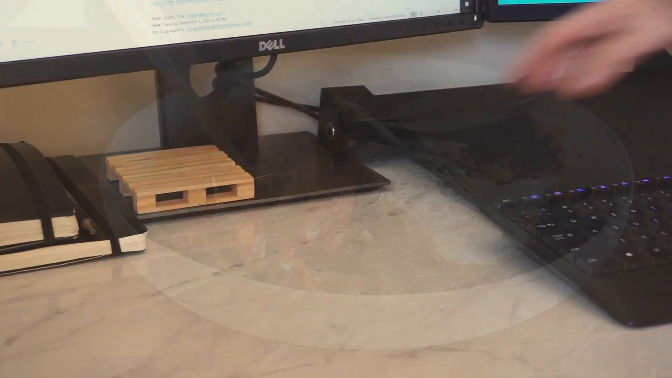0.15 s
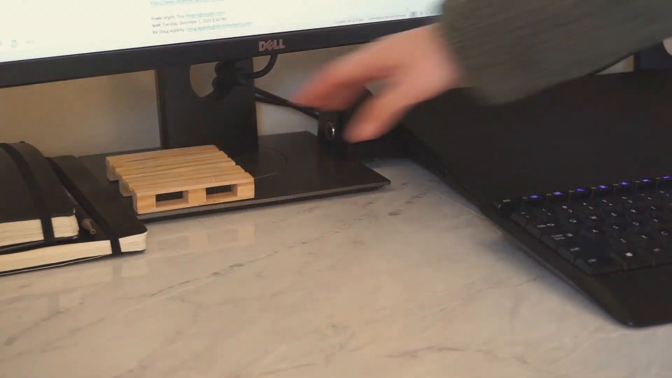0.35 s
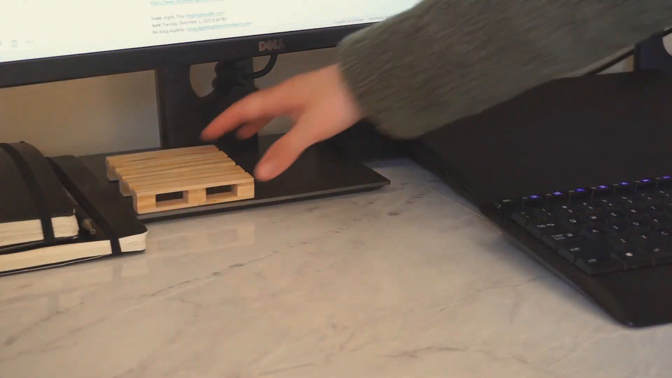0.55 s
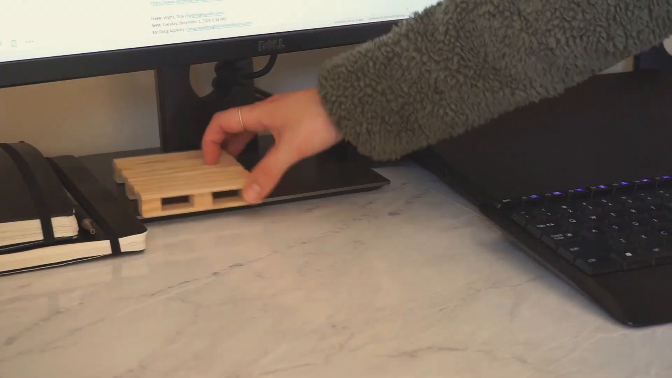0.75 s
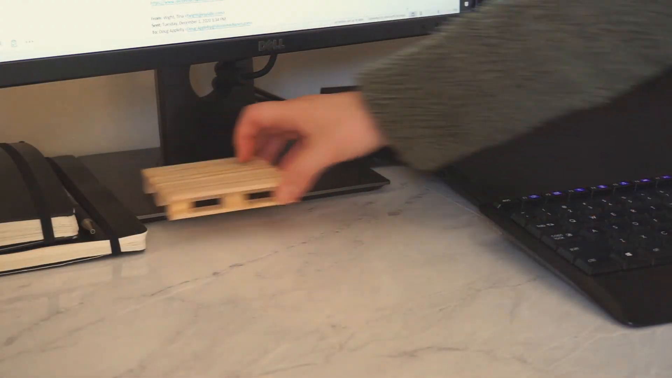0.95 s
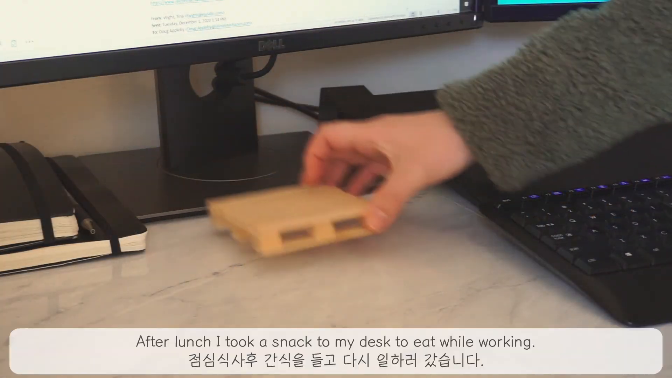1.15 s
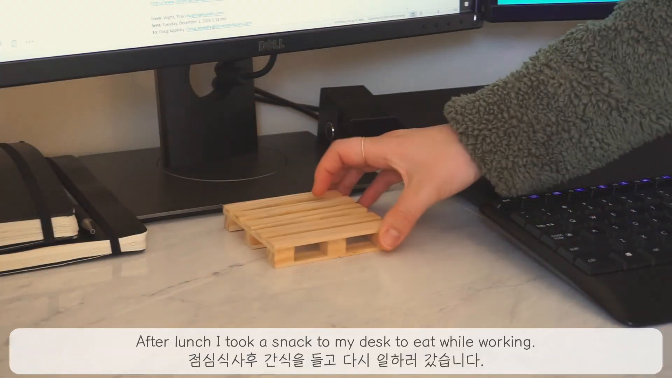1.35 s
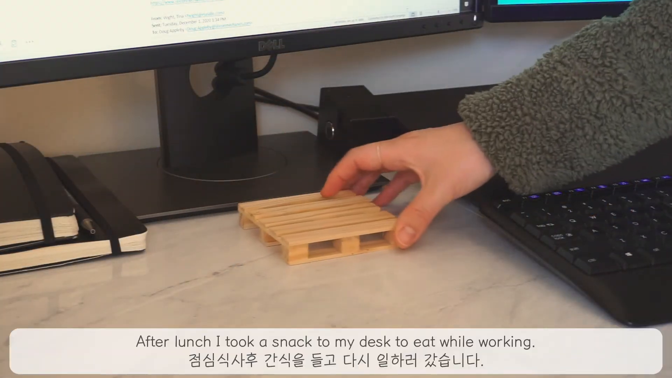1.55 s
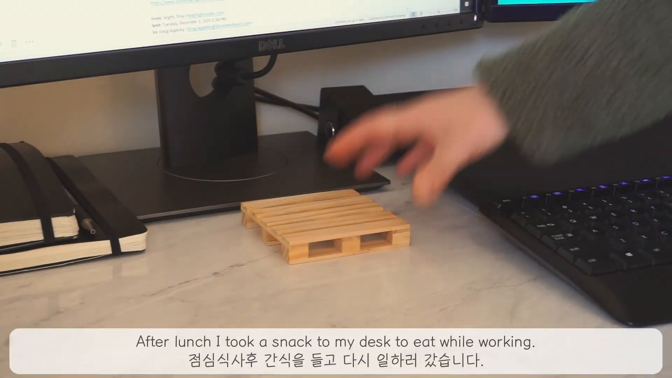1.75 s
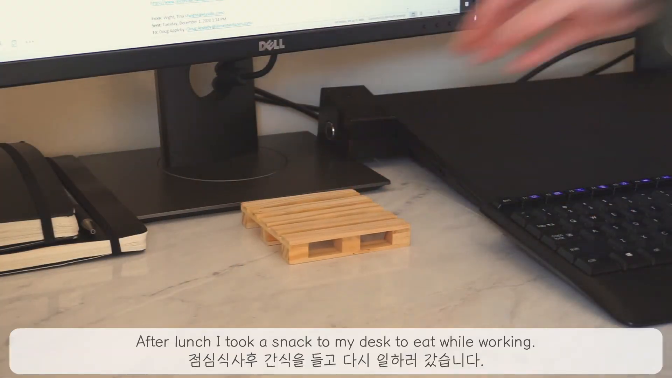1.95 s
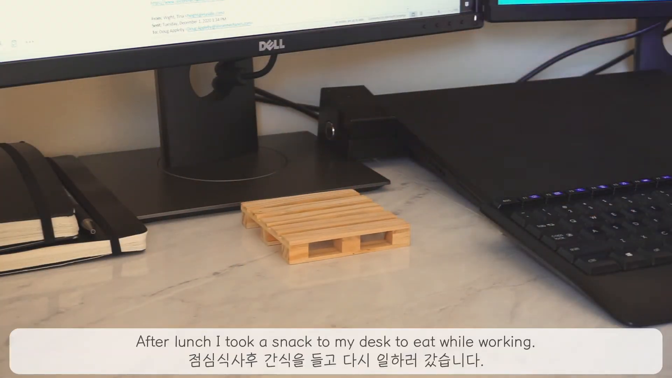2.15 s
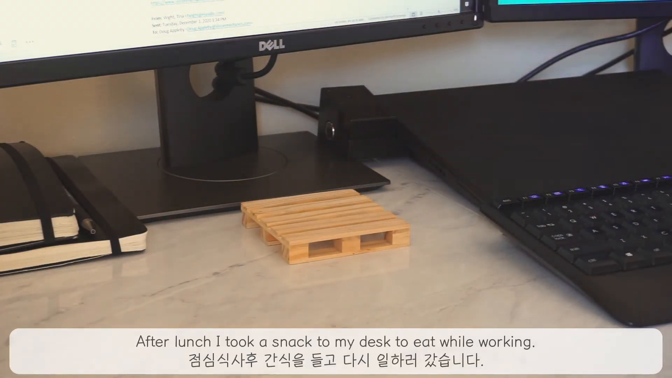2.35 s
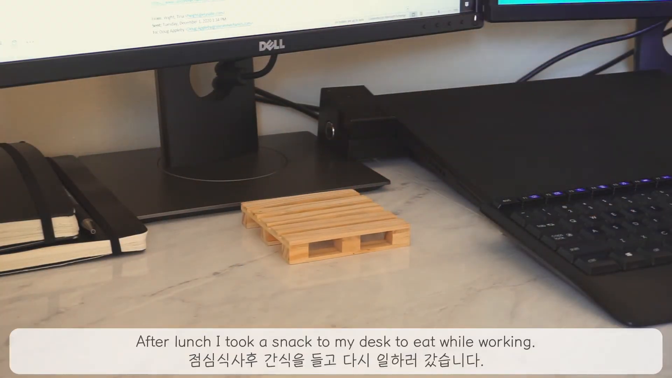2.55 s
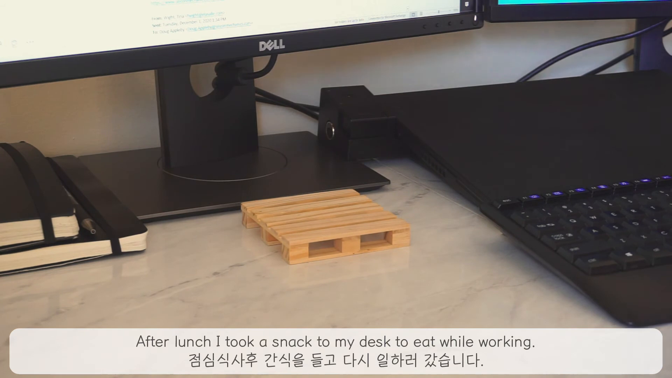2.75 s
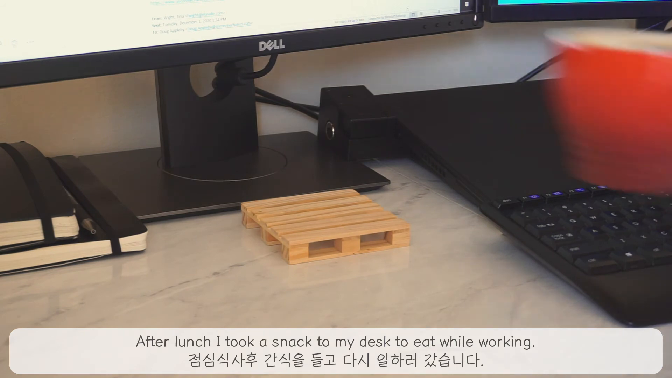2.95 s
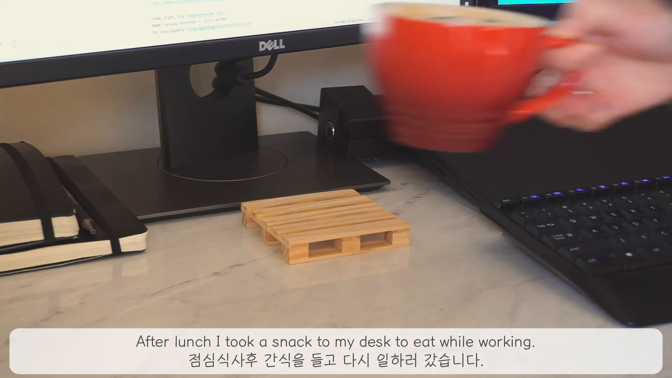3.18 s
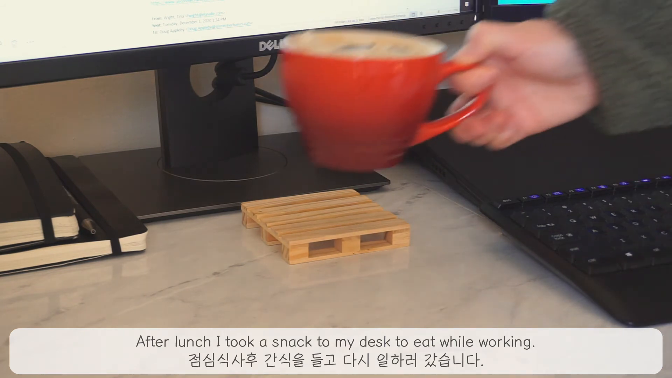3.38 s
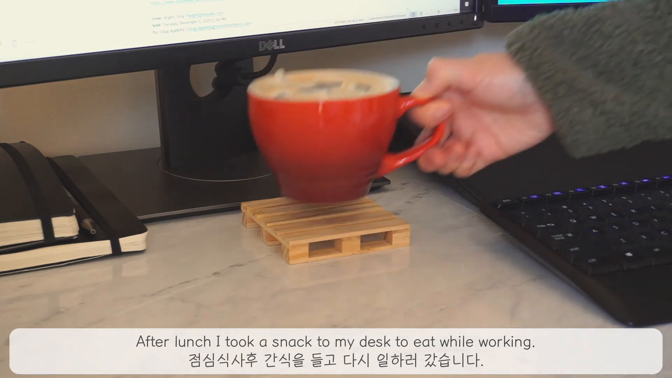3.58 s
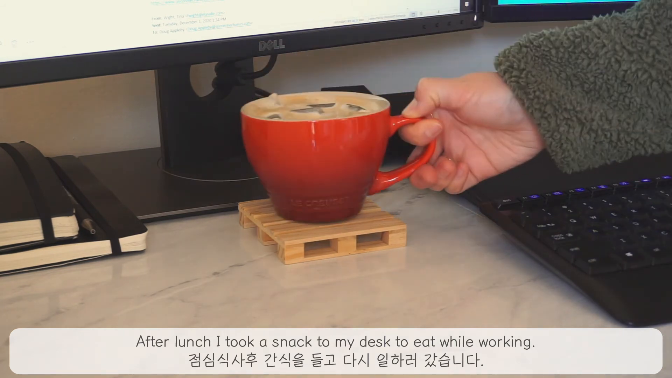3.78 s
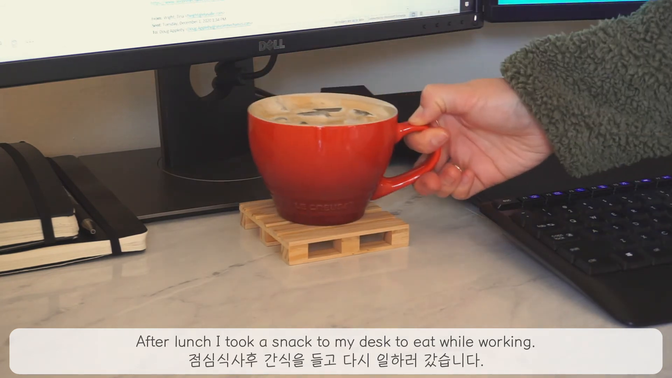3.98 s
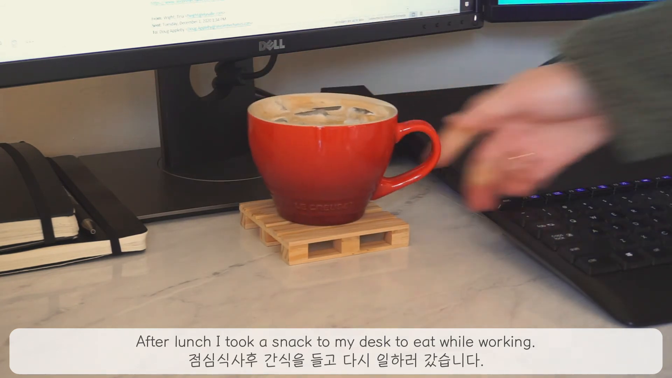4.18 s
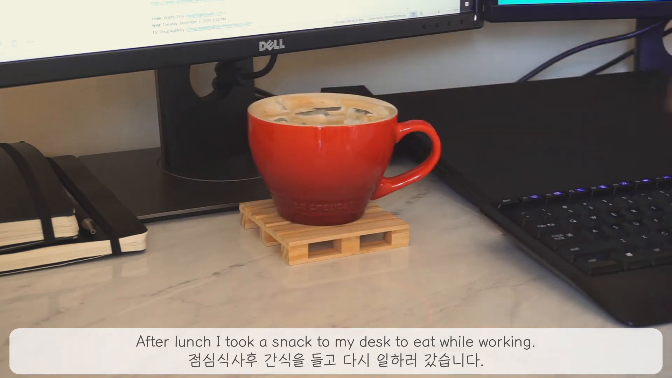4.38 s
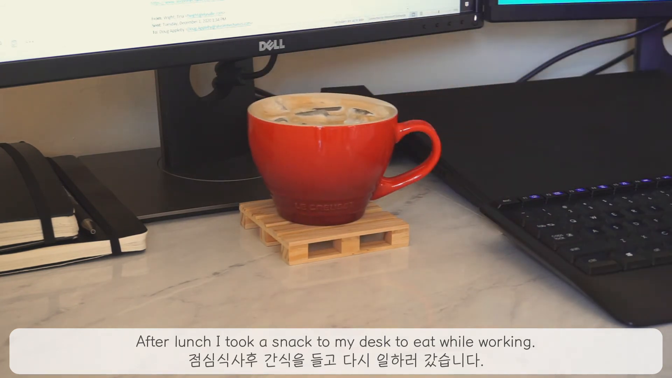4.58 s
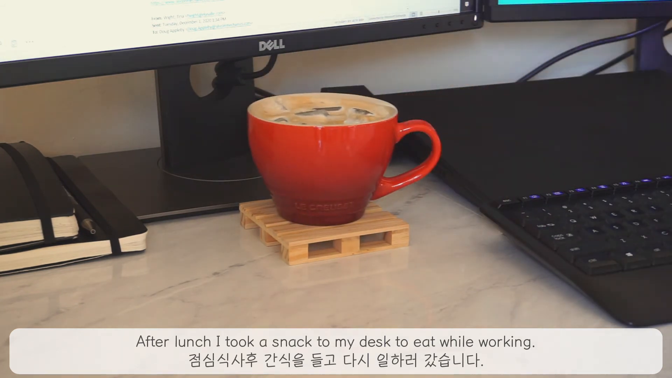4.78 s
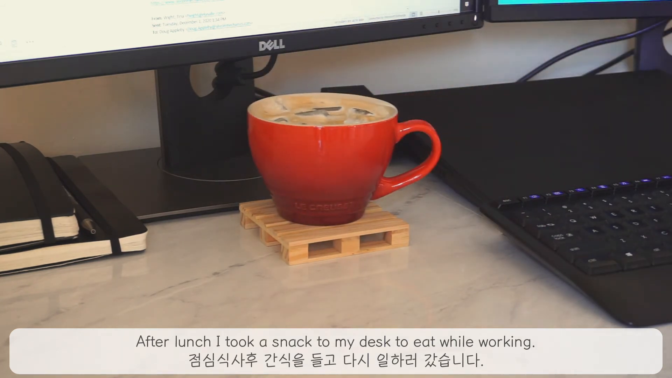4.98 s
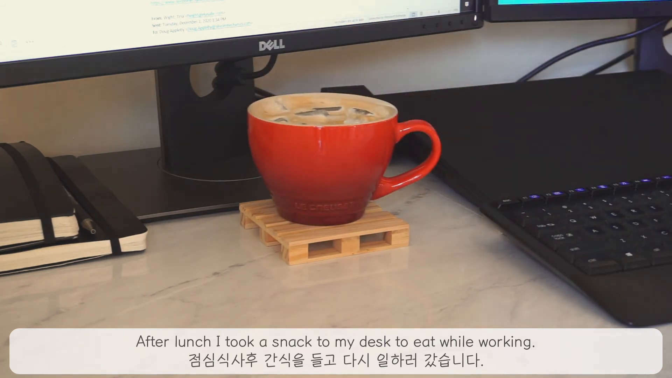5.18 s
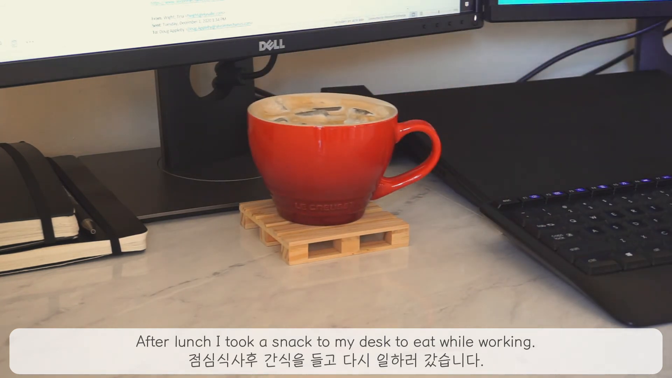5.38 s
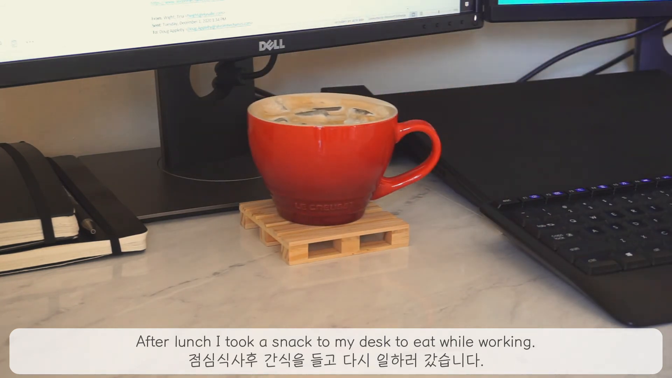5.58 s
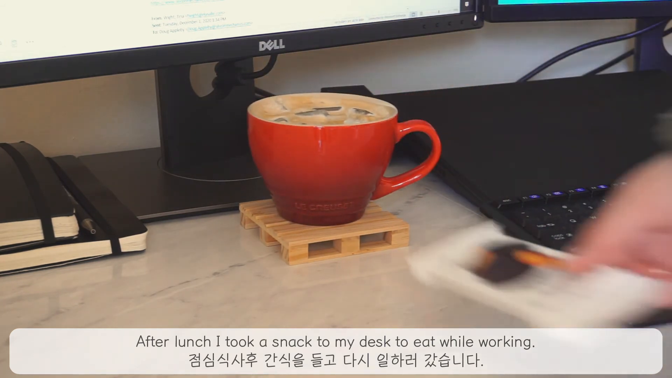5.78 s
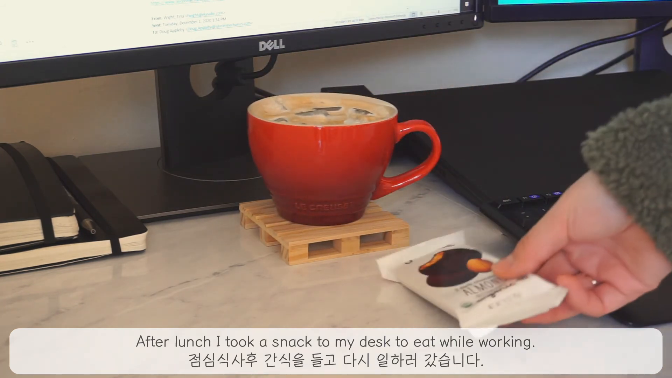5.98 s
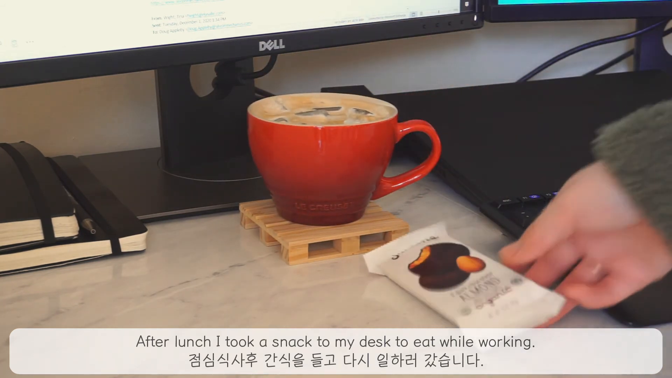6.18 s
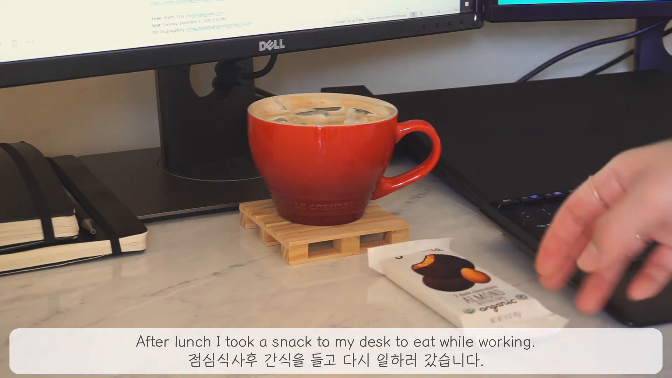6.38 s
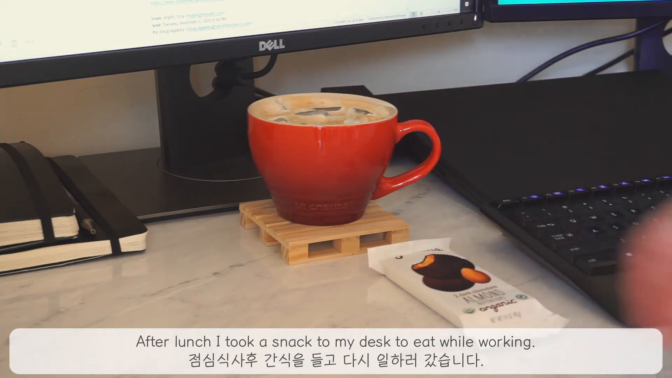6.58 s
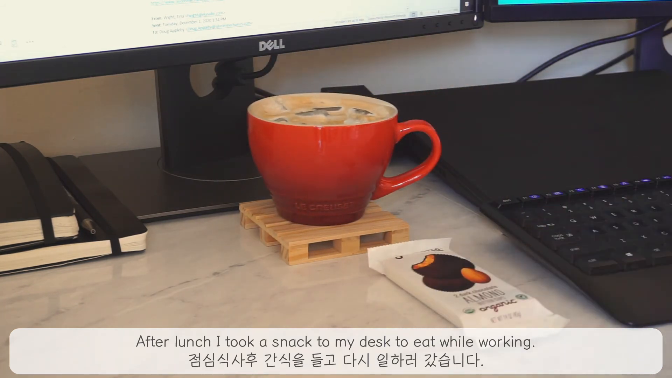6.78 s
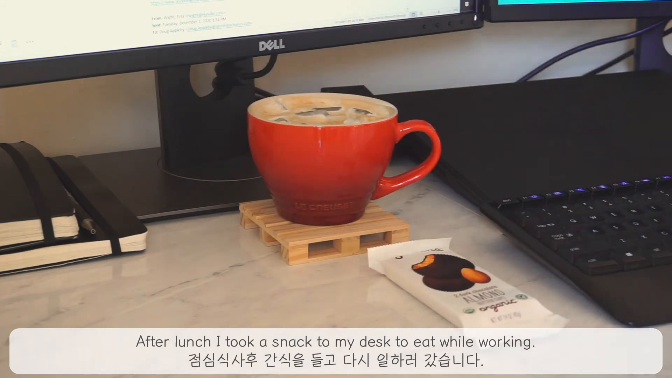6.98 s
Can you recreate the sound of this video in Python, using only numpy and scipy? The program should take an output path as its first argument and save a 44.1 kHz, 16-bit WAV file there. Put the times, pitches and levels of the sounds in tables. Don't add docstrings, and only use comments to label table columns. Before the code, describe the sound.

Close stereo on a desk in a quiet room. A small slatted wooden coaster judders briefly off a thin stand with a hard knock and short scrape, then is set down in two soft taps. A full ceramic mug lands on it with a gritty clunk and low desk boom. After a pause, a plastic snack packet crackles, slaps down and is pressed with sharp snaps. Faint sleeve rustle and hiss lie underneath.

```python
import sys
import numpy as np
from scipy import signal
from scipy.io import wavfile

SR = 44100
rng = np.random.default_rng(int(sys.argv[2]) if len(sys.argv) > 2 else 0)


def wav_out(sig):
    wavfile.write(sys.argv[1], SR, np.round(np.clip(np.atleast_2d(sig).T, -1, 1) * 32767).astype(np.int16))


def level_to_linear(level):
    exponent = np.asarray(level, float) / 20
    return 10 ** exponent


N = 310464

# t/s, level/dB
JUDDER = [
    (0.683, -32),
    (0.691, -28.5),
    (0.698, -21.5),
    (0.703, -24.5),
    (0.712, -25),
    (0.721, -24),
    (0.726, -37),
    (0.729, -34),
    (0.78, -52),
]
# f/Hz, level/dB, t60/s
STAND_MODES = [(737, -12, 0.056), (985, -3, 0.041), (1050, 0.5, 0.025), (1216, -3.5, 0.025),
               (1590, -10.5, 0.039), (1750, -5, 0.019), (2040, -4.5, 0.0073), (3070, -11, 0.0076),
               (4660, -22, .02)]
# t/s, level/dB, upper-mode share/dB
SLIPS = [(0.6841, -32, 4), (0.6867, -33, 3), (0.6899, -24, 0.5), (0.694, -34, 2), (0.6985, -35, 5),
         (0.702, -28, -2), (0.7084, -30, -9), (0.7148, -31, -6), (.7192, -25.5, -5), (0.7278, -29, -9),
         (0.7317, -37, -8), (0.7389, -35, -2), (0.7445, -33, -4), (0.7565, -36, 4), (0.7675, -37, -5),
         (0.772, -42, -2)]
# f/Hz, level/dB, t60/s
PRESSED_MODES = [(1065, 1, .028), (965, -9, .024), (1540, -10, .022), (1720, -9, .018), (2010, -11, .016)]
BREAKS_FREE_S, EASED_PITCH, EASED_RING = .7245, 0.89, .6
# t/s, level/dB, rise/s, fall/s
DRAG = [
    (0.79, -32.5, 0.0023, 0.021),
    (0.822, -37.5, 0.093, 0.065),
    (0.908, -43, 0.12, 0.091),
]
# t/s, level/dB, rise/s, fall/s
SLIDE = [
    (0.684, -43, 0.0027, 0.033),
    (0.779, -41.5, 0.089, 0.041),
    (0.787, -33, 0.0085, 0.017),
    (0.88, -39, 0.088, 0.15),
]
LEAVES_PLATE_S, LEAVING_S = 0.96, 0.01
# f/Hz, level/dB, t60/s
COASTER_MODES = [(198, -8, 0.016), (360, -4.5, 0.026), (595, -2, 0.071), (727, -2, 0.031),
                 (988, 3.5, 0.034), (1270, -1.5, 0.024), (1460, -4, 0.045), (1750, 6, 0.0057),
                 (2500, 0, 0.0075), (4050, -7, 0.012), (4880, -3.5, 0.011)]
# t/s, level/dB, left-right/dB
KNOCKS = [
    (0.786, -18, 7.5),
    (0.824, -39, 7),
    (0.918, -36, 6),
]
# t/s, level/dB, left-right/dB
LANDINGS = [
    (1.2368, -36, 3.5),
    (1.3365, -33, 4),
]
EDGE_CHOKE, EDGE_DB = 0.27, 6.5
# f/Hz, level/dB, t60/s
COASTER_DOWN_MODES = [(359, -2, 0.19), (567, -4, 0.052), (760, -3, 0.031), (900, -14, 0.021),
                      (1120, 1.5, 0.016), (1490, 0, 0.025), (1780, 1, 0.014), (2240, -7, 0.025),
                      (2590, -8.5, 0.017)]
# t/s, level/dB, rise/s, fall/s
SHUFFLE = [
    (1.243, -58, .001, 0.036),
    (1.343, -52, .001, 0.089),
]

# t/s, level/dB, f/Hz, dying/ms, broad part/dB
MUG_TOUCHES = [
    (3.743, -27, 1020, 2, -25),
    (3.738, -42, 1400, 2.5, -24),
    (3.7424, -30, 4870, 2, -23),
    (3.7432, -22, 2060, 0.87, -21),
    (3.7436, -21, 5000, 1.5, -8),
    (3.7459, -17, 2500, 1.3, -27),
    (3.7504, -30, 4500, 1.1, -24),
    (3.786, -31, 7500, 5.9, 7),
    (3.882, -42, 5070, 34, 5),
    (3.986, -49, 1200, 4.3, -8),
]
MUG_PAN_DB = 6
# f/Hz, level/dB, t60/s
MUG_MODES = [(325, -1, 0.012), (528, -6, 0.021), (700, -2.5, 0.012), (980, -4, 0.023), (1380, -2, 0.0064),
             (1800, 1, 0.012), (2050, 1, .01), (2440, -1, 0.011), (2760, -3, 0.012), (4400, 0, 0.0029),
             (5100, -13, 0.0069), (7500, -10, .002), (9500, -25, .002)]
# f/Hz, level/dB, t60/s
CLINK_MODES = [(2040, -24, .008), (2690, -40, 0.018), (4940, -24.5, 0.015), (1500, -35, 0.04)]
CLINK_S = 3.7426
# t/s, level/dB, rise/s, fall/s
SETTLE = [
    (3.748, -31.5, .001, 0.024),
    (3.775, -38, 0.027, 0.11),
    (3.883, -49.5, .02, 0.062),
]

# f/Hz, level/dB, t60/s, side of the node line
DESK_MODES = [(81.4, -26, .21, 1), (97.1, -22, .16, 1), (109.3, -13, .02, -1), (119.3, -15, .21, 1),
              (124.7, -20, .58, -1), (138.2, -23, .35, -1), (149.3, -38, .48, -1), (181, -37, .3, 1),
              (203.6, -46, .6, 1), (249.7, -39, .08, 1), (349.2, -33, .08, -1)]
MUG_LANDS_S = 3.7425
STILLED_S, STILLING_S = 3.955, 0.055
# t/s, level/dB
PUSHES = [
    (1.338, -44),
    (2.437, -44),
    (3.985, -41.5),
    (4.237, -47),
]
# t/s, level/dB
PATS = [
    (0.689, -43.5),
    (0.789, -36),
    (1.238, -44),
    (3.985, -50),
    (5.995, -47),
    (6.246, -55),
    (6.298, -55),
    (6.33, -55),
]
# f/Hz, level/dB, t60/s
DESK_HELD_MODES = [(78, -2.5, 0.077), (122.4, -3, 0.37), (154, -5, 0.12), (242, -9.5, 0.13)]

# t/s, level/dB, f/Hz, dying/ms, left-right/dB
SNAPS = [(4.254, -41, 5500, 1.5, 14), (5.345, -45, 2680, 1.4, -4), (5.573, -46, 3150, 1.5, -12),
         (5.6335, -44, 2600, 2, -4), (5.645, -45, 3840, 3.7, -11), (5.706, -43, 3550, 13, -8),
         (5.751, -43, 3520, 1, -9), (5.875, -57, 4440, 1.3, -4), (5.946, -44, 6460, 1.3, -3),
         (5.979, -25, 2580, 1.7, -4), (5.985, -42, 2690, 1.3, 0), (5.9925, -25, 2580, 1.3, -3),
         (5.995, -14, 6000, 0.43, 6), (6.003, -31, 4500, 1.5, 6), (6.0081, -21.5, 3860, 0.84, 3),
         (6.01, -24, 4130, 1.3, 6), (6.024, -44, 2680, 1.3, 5), (6.1714, -22, 3230, 4.7, 1.5),
         (6.181, -24, 3830, 1, 6), (6.338, -41, 2780, 1.7, -3)]
# t/s, level/dB, f/Hz, dying/ms, left-right/dB
CRACKS = [
    (5.39, -20.5, 2310, 4.3, -9),
    (5.397, -22.5, 3400, 2.9, 6),
    (5.596, -46, 4000, 1.3, -12),
    (6.183, -20, 2290, 0.48, 6),
    (6.243, -19, 3220, 1.6, 0),
    (6.245, -22.5, 2500, 4.8, 6),
    (6.251, -23, 3820, 2.7, 2),
    (6.298, -33, 2780, 2, -2),
]
SNAP_BROAD_DB, CRACK_BROAD_DB = -16, 0
# t/s, level/dB, f/Hz, dying/ms
THUDS = [(4.245, -47, 5500, 6.1), (4.973, -43, 1490, 9.9), (6.1725, -29.5, 1560, 2.9),
         (2.965, -49, 2500, 40), (6.213, -29, 2500, 14), (4.903, -46, 3570, 20), (5.389, -29, 948, 3.6),
         (5.794, -36, 780, 6.8), (5.996, -18.5, 1150, 4.2), (6.05, -37, 3300, 11), (6.174, -34, 3550, 1.6),
         (6.2445, -35, 920, 3.5), (6.299, -30, 700, 2.6)]
THUD_PAN_DB, THUD_BROAD_DB, THUD_BROAD_DB_PER_OCTAVE = -2, -13, 1
# t/s, level/dB, rise/s, fall/s
CRACKLE = [(4.905, -50.5, 0.0033, 0.19), (4.961, -58, 0.013, 0.082), (5.05, -64, 0.24, 0.91),
           (5.355, -58, 0.075, 0.18), (5.63, -58, 0.49, 0.13), (5.712, -65, 0.07, .11),
           (5.75, -55.5, 0.045, 0.19), (5.81, -56, 0.043, 0.05), (5.86, -64, .021, 0.29),
           (5.979, -41.5, 0.0061, 0.03), (6.05, -49.5, 0.022, 0.038), (6.14, -57.5, 0.4, .3),
           (6.221, -44.5, 0.027, 0.02), (6.256, -46.5, .04, 0.13), (6.304, -38, 0.021, 0.013),
           (6.339, -53, 0.023, 0.026), (6.355, -71, .021, 0.11)]
# t/s, level/dB
SPRINGS = [
    (5.404, -42.5),
    (6.013, -39.5),
    (6.184, -41.5),
]
SPRING_RISE_S, SPRING_FALL_S, RELAX_DB, RELAX_FALL_S = 0.0061, 0.007, -10, 0.13
# f/Hz, level/dB per Hz
FILM = [(250, -17), (500, -6.5), (1000, -8.5), (2000, -6), (3000, -6.5), (5000, -9), (7500, -17),
        (11000, -11.5)]
# t/s, level/dB, left-right/dB
PRICKS = [(4.9045, -40, 0), (5.3975, -29, 3), (5.5965, -33, -4), (5.6338, -34, -3), (5.6358, -31, -3),
          (5.6415, -34, -3), (5.7518, -26, -4), (5.9927, -21, 0), (5.9951, -11, 4), (5.9966, -15, 2),
          (6.1717, -15, 2), (6.1738, -18, 2), (6.2437, -24, 2)]
PRICK_LOW_HZ = 1800

# t/s, level/dB, f/Hz, t60/ms, left-
# right/dB
PINGS = [(.7875, -21, 1780, 27, 4), (0.7939, -36.5, 187, 61, 0), (3.7435, -24, 1900, 5, 4),
         (3.8805, -38, 6200, 3, 3), (4.2435, -50, 3480, 20, 1), (4.247, -51, 2930, 20, 3),
         (4.251, -44, 2600, 20, 3), (4.2542, -41, 3100, 4, 3), (4.2524, -46, 9200, 5, 3),
         (5.3895, -37.5, 900, 35, -1.5), (5.3896, -37, 2240, 14, -1.5), (5.397, -28, 5040, 5.6, 5),
         (5.3985, -33, 2570, 9, 1.5), (5.634, -39, 8000, 1.2, -3), (5.7527, -43, 2800, 1.5, -3),
         (5.7945, -49, 2100, 14, -1.5), (5.7975, -43.5, 760, 45, -1.5), (5.9949, -24, 5940, 4.4, 6),
         (5.996, -30, 1148, 17, 4), (.8245, -39, 1780, 18, 1), (.9185, -30, 1003, 25, 4),
         (5.9783, -32, 2610, 19, -1.5), (5.9865, -38, 2700, 12, 3), (6.0085, -26, 1510, 6.3, 0),
         (6.047, -45, 1030, 90, 3), (6.056, -40, 1037, 60, 3), (6.1712, -25, 3600, 10, 1),
         (6.1735, -40, 3270, 11, 2.5), (6.1798, -31, 3940, 8.3, 2.5), (6.1828, -32, 2120, 14, 0),
         (6.2135, -34, 5670, 25, 1.5), (6.2185, -36, 2810, 25, 1.5), (6.2425, -29, 3330, 8, 5),
         (6.2427, -30, 1600, 13, 4), (6.3005, -39, 5200, 6, 1.5), (6.2455, -30.5, 2450, 14, 10),
         (6.2995, -35, 3000, 9.5, 1.5), (6.3372, -39, 2760, 12, -1),
         (.797, -37, 273, 52, -2),
    (2.2, -53.5, 720, 34, 1.5),
    (5.7957, -46.5, 330, 43, 1.5),
    (6.1718, -35.5, 660, 13, 2.5),
    (6.2446, -36.5, 416, 28, 2.5),
    (6.2535, -40, 900, 14, 2.5),
    (6.302, -38, 514, 32, 1.5),
    (6.304, -42.5, 736, 30, 1.5),
    (.918, -40, 403, 32, 2),
]
# t/s, level/dB, f/Hz, t60/ms, left-right/dB
DRY_PINGS = [
    (3.7435, -9.5, 2300, 5, 4),
    (3.984, -38, 140, 50, 0),
    (6.2455, -36, 145, 50, 1),
    (6.2985, -31, 132, 48, 1),
    (6.3325, -41, 145, 60, 1),
    (5.995, -18, 2200, 3, 1),
    (3.746, -20, 2550, 9, 4),
]
CYCLES_MAX = 32

# t/s, dull rub level/dB, rise/s, fall/s, brightness/dB
SLEEVE = [(.3, -64.5, 1.2, 0.8, -1.5), (.58, -69, 0.34, 0.44, -1.5), (1.04, -64, .08, 0.6, -2.5),
          (1.46, -70.5, 0.056, 0.27, -2), (1.652, -69.5, 0.019, 0.043, 7.5), (2.17, -66.5, 0.14, .1, -1),
          (2.384, -60.5, 0.4, 0.37, -4.5), (2.84, -64, 0.33, 0.31, -1.5), (2.962, -59.5, 0.21, 0.2, 3.5),
          (3.99, -55, 0.088, 0.039, -6), (4.02, -63.5, .15, 0.28, -5), (4.251, -60.5, 0.024, 0.059, 9),
          (4.3, -73.5, .03, 0.26, 8.5), (4.47, -70.5, 0.52, 0.74, -8), (4.725, -65.5, 0.023, 0.14, -8),
          (6.42, -67.5, 0.063, 0.48, 0.5), (6.64, -68, .11, .021, -7), (7.03, -72, .21, .11, -3)]
# f/Hz, level/dB per Hz
RUB = [(150, -14), (400, 2), (1000, -2), (2500, -6.5), (5000, -60)]
# f/Hz, level/dB per Hz
BRUSH = [(960, -25), (2000, 4), (3000, 4), (6000, 3), (10800, 2.5)]
# f/Hz, level/dB per Hz
SHEEN = [(960, -18), (2000, 2), (5000, -1.5), (8000, -5.5), (10800, -2)]

# t/s, level/dB, f/Hz, dying/ms, left-right/dB
TICKS = [
    (0.657, -46, 7500, 1.3, 5),
    (5.125, -53, 950, 6.5, 1.5),
    (5.204, -51, 900, 7, -1),
    (5.344, -43.5, 1670, 6.5, -2),
]
TICK_BROAD_DB = -38
# t/s, level/dB, rise/s, fall/s, f/Hz
WHISTLES = [
    (.31, -62.5, 0.22, 0.58, 739),
    (.958, -48, .012, 0.026, 9000),
    (4.91, -49.5, .008, 0.18, 2780),
    (4.97, -57, .06, .05, 3750),
    (4.91, -51, .008, 0.14, 4650),
    (5.71, -55.5, 0.057, .05, 3650),
    (5.815, -49.5, 0.075, 0.022, 5450),
    (2.83, -57.5, .1, 0.12, 10000),
    (2.985, -55, 0.07, .03, 2430),
]
# f/Hz, ring/cycles
WHISTLE_CYCLES = [(738, 69), (2900, 14), (3600, 28), (5500, 6.3), (8970, 260), (9900, 9.2)]

# f/Hz, level/dB per Hz
ROOM_TONE = [(12, -32), (20, -5.5), (53, -0.5), (67, -8), (81, -2.5), (111, -17.5), (312, -19),
             (385, -22.5), (528, -20.5), (785, -26), (1170, -24), (1260, -25), (3270, -31), (3930, -31),
             (11000, -35.5), (14300, -58), (22000, -120)]
ROOM_TONE_DB = -55
# f/Hz, left-right likeness
FAR_LIKENESS = [(60, 1), (130, 0.75), (270, 0.29), (560, -0.12), (1170, -0.47), (2460, -0.22),
                (5180, -0.15), (10900, -0.035)]
# f/Hz, left-right likeness
NEAR_LIKENESS = [(60, 0.94), (220, 0.83), (810, 0.32), (2960, 0.11), (10900, 0.18)]
# f/Hz, t60/s
REVERB = [(150, 0.63), (500, 0.42), (2000, 0.26), (5000, 0.32), (10000, 0.32)]
LEFT_LAG = 1
CUTOFF_HZ = 11016
SWELL_DB = 20
EDGES = 20 * 2 ** np.arange(0, 9.6, .5)


def coaster():
    judder = level_to_linear(-9) * rubbed(in_time(JUDDER)[0], STAND_MODES, 2500, 1.2)
    rumble = rubbed(swells(DRAG), COASTER_MODES, 1500, 0.96)
    shuffle = rubbed(swells(SHUFFLE), COASTER_DOWN_MODES, 1500, 3.4)
    sheen = coloured(grains(9000, 1.7), SHEEN, NEAR_LIKENESS, patchy_db=1.0)
    hiss = swells(SLIDE) * stilled(LEAVES_PLATE_S, LEAVING_S) * sheen
    cracks = burst([(s, db - 1.0, 4500, 1.5, pan, -9) for s, db, pan in KNOCKS], width=1.47)
    ticks = burst([(s, db - 3.0, 1700, .9, pan, -12) for s, db, pan in LANDINGS], width=12.0)
    knocks = level_to_linear(-13.0) * struck(KNOCKS, COASTER_MODES, 2.2, 1.5)
    gripped = [(hz, db + EDGE_DB, t60 * EDGE_CHOKE) for hz, db, t60 in COASTER_DOWN_MODES]
    landed = struck(LANDINGS[:1], gripped, 1, 1.5) + struck(LANDINGS[1:], COASTER_DOWN_MODES, 1, 1.5)
    rubbing = judder + rumble + shuffle + hiss
    return rubbing * placed(4.4) + knocks + level_to_linear(-9.0) * landed + cracks + ticks


def slips():
    rows, plate = np.array(SLIPS), 0
    held = rows[:, 0] < BREAKS_FREE_S
    for group, pitch, left in ((rows[held], 1, 1), (rows[~held], EASED_PITCH, EASED_RING)):
        s, db, upper_db = group.T
        for k, (hz, mode_db, t60) in enumerate(PRESSED_MODES):
            blows = click(s, db + upper_db * (k > 1))
            plate = plate + level_to_linear(mode_db) * ring(blows, hz * pitch, t60 * left)
    return band(band(plate, 860, 2550), 700, 3000) * placed(4.4)


def mug():
    touches = [(*row, MUG_PAN_DB, broad_db) for *row, broad_db in MUG_TOUCHES]
    blow = click(CLINK_S, 0) * placed(MUG_PAN_DB)
    clink = sum(level_to_linear(db) * ring(blow, hz, t60) for hz, db, t60 in CLINK_MODES)
    creak = level_to_linear(1.0) * rubbed(swells(SETTLE), MUG_MODES, 9000, 1.8)
    return burst(touches, width=1.224) + clink + creak


def desk():
    blow = click(MUG_LANDS_S, 0)
    boom = sum(side * level_to_linear(db) * ring(blow, hz, t60) for hz, db, t60, side in DESK_MODES)
    boom = boom * stilled(STILLED_S, STILLING_S)
    boom = np.stack([boom, np.roll(boom, 14)])
    light = struck([(s, db, -.3) for s, db in PUSHES], DESK_HELD_MODES, 1.0, 2.0)
    deadened = [(hz * 1.09, db, t60 * 0.3) for hz, db, t60 in DESK_HELD_MODES]
    light += struck([(s, db, -.3) for s, db in PATS], deadened, 2.2, 1.9)
    return boom + band(light, 55, 500)


def packet():
    clumps = level_to_linear(1.5 * drift(25))
    film = coloured(grains(5000 * clumps, 1.0), FILM, NEAR_LIKENESS, patchy_db=2.5)
    snaps = [(*row, SNAP_BROAD_DB) for row in SNAPS]
    cracks = [(*row, CRACK_BROAD_DB) for row in CRACKS]
    thuds = []
    for s, db, hz, ms in THUDS:
        broad_db = THUD_BROAD_DB + THUD_BROAD_DB_PER_OCTAVE * np.log2(hz * 0.00059)
        thuds.append((s, db, hz, ms, THUD_PAN_DB, broad_db))
    spurts = [(s, db, SPRING_RISE_S, SPRING_FALL_S) for s, db in SPRINGS]
    relaxing = [(s, db + RELAX_DB, SPRING_RISE_S, RELAX_FALL_S) for s, db in SPRINGS]
    bed = level_to_linear(4.0) * swells(CRACKLE + spurts + relaxing) * film * placed_bed()
    return burst(sorted(snaps + cracks), width=1.27) + burst(thuds, width=1.13) + bed


def placed_bed():
    return placed(2.2)


def pricks():
    s, db, pan_db = np.transpose(PRICKS)
    clicks = [click(s, db + side * pan_db) for side in (.5, -.5)]
    return signal.sosfilt(signal.butter(2, PRICK_LOW_HZ, "high", fs=SR, output="sos"), clicks)


def pings(rows):
    tones = 0
    for s, db, hz, ms, pan_db in rows:
        t60 = np.clip(ms / 1000, 3 / hz, CYCLES_MAX / hz)
        tone = band(ring(click(s, db), hz, t60), hz / 1.75, hz * 1.76)
        tones = tones + tone * placed(pan_db)
    return tones


def sleeve():
    dull = swells([row[:-1] for row in SLEEVE])
    bright = swells([(s, db + bright_db, rise, fall) for s, db, rise, fall, bright_db in SLEEVE])
    white = rng.standard_normal((2, 2, N))
    rub = coloured(white, RUB, FAR_LIKENESS, 2.5)
    return dull * rub + bright * coloured(white[::-1], BRUSH, FAR_LIKENESS, 3.6)


def faint():
    out = burst([(*row, TICK_BROAD_DB) for row in TICKS], width=1.29)
    air = rng.standard_normal((2, N))
    for *row, hz in WHISTLES:
        out = out + swells([row]) * rms_one(ring(air, hz, at_hz(WHISTLE_CYCLES, hz) / hz))
    return out


def room(x):
    t = np.arange(SR // 2) / SR
    white = rng.standard_normal((2, len(t)))
    tail = 0
    for low, high in zip(EDGES[5:-1], EDGES[6:]):
        tail = tail + band(white, low, high) * level_to_linear(-60 * t / at_hz(REVERB, low))
    tail *= np.clip((t - .003) / 0.022, 0, 1)
    tail /= np.sqrt(np.sum(tail ** 2) / 2)
    return signal.fftconvolve(x.mean(axis=0)[None], tail, axes=1)[:, :N]


def room_tone():
    white = rng.standard_normal((2, 2, N))
    return level_to_linear(ROOM_TONE_DB) * coloured(white, ROOM_TONE, FAR_LIKENESS, patchy_db=0.23)


def rubbed(force, modes, per_s, spread_db):
    blows = grains(per_s, spread_db)[0]
    blows = (blows[0] + 0.37 * blows) * force
    body = sum(level_to_linear(db) * (-1) ** k * ring(blows, hz, t60) for k, (hz, db, t60) in enumerate(modes))
    return rms_one(body) * np.sqrt(np.mean(force ** 2))


def struck(blows, modes, spread_db, unlike_db):
    s, level_db, pan_db = np.transpose(blows)
    luck, out = rng.standard_normal((len(blows), len(modes), 2)), np.zeros((2, N))
    for k, (hz, mode_db, t60) in enumerate(modes):
        clicks = np.zeros((2, N))
        lean_db = np.outer([.5, -.5], np.clip(pan_db, -6, 6) + unlike_db * luck[:, k, 1])
        strength = level_to_linear(level_db + mode_db + spread_db * luck[:, k, 0] + lean_db)
        clicks[:, (s * SR).astype(int)] = (-1) ** k * strength
        out += ring(clicks, hz, t60)
    return out


def burst(rows, width):
    out, t = np.zeros((2, N)), np.arange(2000) / SR
    noises = rng.standard_normal((len(rows), 3, 2000))
    for (s, level_db, hz, ms, pan_db, broad_db), noise in zip(rows, noises):
        puff = (noise[0] + 1.05 * noise[1:]) * np.exp(-t / (max(ms, .2) / 1000))
        puff = band(puff, hz / width, min(hz * width, 14000)) + level_to_linear(broad_db) * band(puff, 610, 22000)
        i = round(s * SR)
        out[:, i:i + 2000] += puff / np.abs(puff).max() * level_to_linear(level_db) * placed(np.clip(pan_db, -6, 6))
    return out


def ring(clicks, hz, t60):
    r, w = level_to_linear(-60 / (t60 * SR)), 2 * np.pi * hz / SR
    busy = np.flatnonzero(np.abs(clicks).reshape(-1, N).max(axis=0) > 1e-7)
    span, out = slice(busy[0], busy[-1] + int(2 * t60 * SR)), np.zeros(clicks.shape)
    out[..., span] = signal.lfilter([0, np.sin(w)], [1, -2 * r * np.cos(w), r * r], clicks[..., span] + 1e-18)
    return out


def click(s, db):
    out = np.zeros(N)
    out[np.round(np.asarray(s) * SR).astype(int)] = level_to_linear(db)
    return out


def grains(per_s, spread_db):
    shape = (2, 2, N)
    sizes = level_to_linear(spread_db * np.minimum(rng.exponential(1, N), 4)) * (rng.random(N) < per_s / SR)
    return sizes * rng.standard_normal(shape) + 1e-9


def coloured(white, spectrum, likeness, patchy_db):
    out = 0
    for k, (low, high) in enumerate(zip(EDGES, EDGES[1:])):
        hz = np.sqrt(low * high)
        if spectrum[0][0] / 1.2 < hz < spectrum[-1][0] * 1.2:
            draw = white[k % 2]
            led_in = np.concatenate([draw[:, -SR // 4:], draw], axis=1)
            mid, side = band(led_in, low, high)[:, -N:]
            alike = np.clip(at_hz(likeness, hz), -1, 1)
            gain = level_to_linear(at_hz(spectrum, min(hz, CUTOFF_HZ)) + patchy_db * drift(9.0))
            out = out + gain * (np.sqrt(1 + alike) * mid + np.sqrt(1 - alike) * side * [[1], [-1]])
    return rms_one(out)


def swells(rows):
    t, power = np.arange(0, N + 8, 8) / SR, 0
    for s, db, rise, fall in rows:
        away = np.where(t < s, (s - t) / max(rise, 1e-3), (t - s) / max(fall, 1e-3))
        power = power + level_to_linear(2 * np.maximum(db - SWELL_DB * away, -200))
    return np.interp(np.arange(N) / SR, t, np.sqrt(power))


def in_time(*tables):
    t = np.arange(N) / SR
    return sum(level_to_linear([np.interp(t, rows[0], c, -200, -200) for c in rows[1:]]) for rows in map(np.transpose, tables))


def stilled(start_s, length_s):
    return level_to_linear(-SWELL_DB * np.maximum(np.arange(N) / SR - start_s, 0) / length_s)


def drift(rate):
    r = np.exp(-80 * np.pi * rate / SR)
    slow = signal.lfilter([1], [1, -2 * r, r * r], rng.standard_normal(N // 40 + 2002))[2000:]
    return np.interp(np.arange(N) / 40, np.arange(len(slow)), rms_one(slow))


def placed(pan_db):
    return level_to_linear([[pan_db / 2], [-pan_db / 2]])


def band(x, low_hz, high_hz):
    return signal.sosfilt(signal.butter(2, [low_hz, high_hz], "band", fs=SR, output="sos"), x)


def at_hz(points, hz):
    return np.interp(np.log(hz), np.log(np.array(points)[:, 0]), np.array(points)[:, 1])


def rms_one(x):
    return x / np.sqrt(np.mean(x ** 2) + 1e-20)


def scene():
    near = coaster() + slips() + mug() + packet() + pings(PINGS) + pricks()
    near[0] = np.roll(near[0], LEFT_LAG)
    without_room = desk() + pings(DRY_PINGS)
    return near + level_to_linear(-5.5) * room(near) + without_room + level_to_linear(4.0) * sleeve() + faint() + room_tone()


def roll_off(x):
    return signal.sosfilt(signal.butter(12, 11480, fs=SR, output="sos"), x)


def record(dry):
    cut = signal.sosfilt(signal.ellip(10, .5, 33, CUTOFF_HZ, fs=SR, output="sos"), dry)
    return roll_off(cut)


dry = scene()
out = record(dry)
wav_out(out)
```